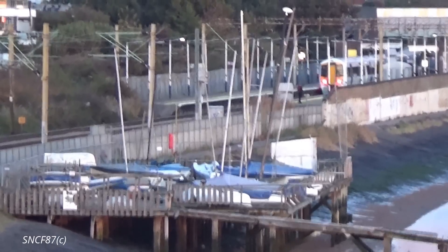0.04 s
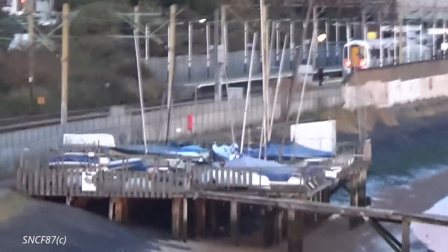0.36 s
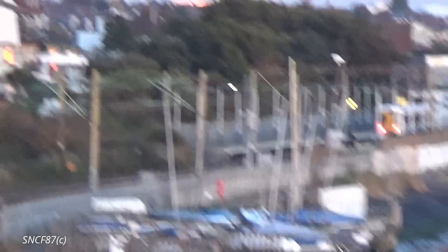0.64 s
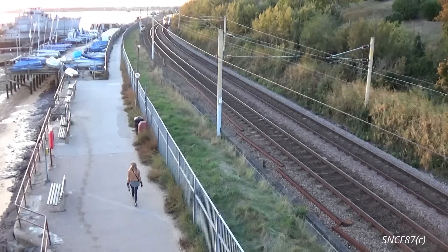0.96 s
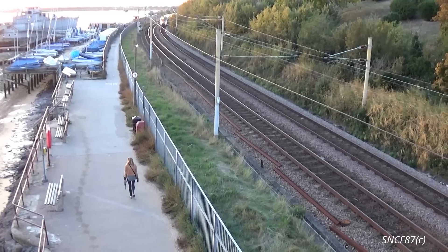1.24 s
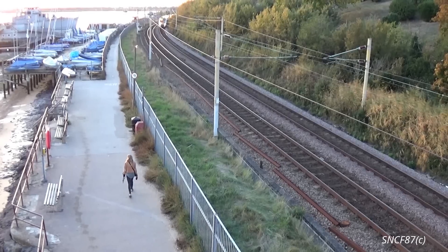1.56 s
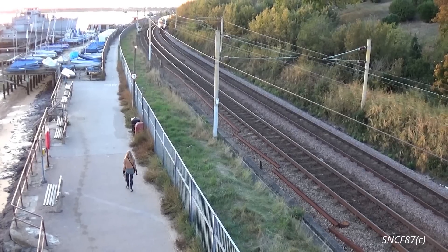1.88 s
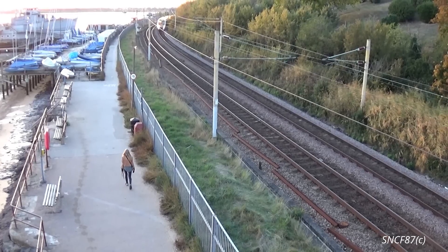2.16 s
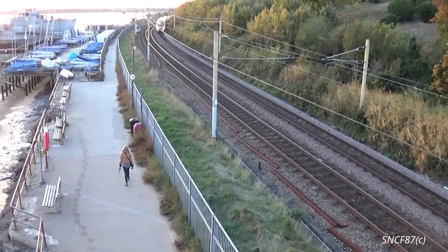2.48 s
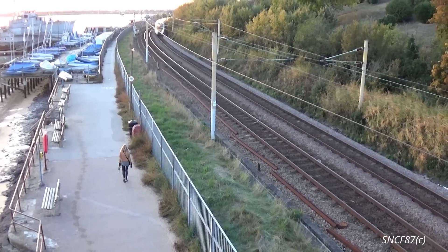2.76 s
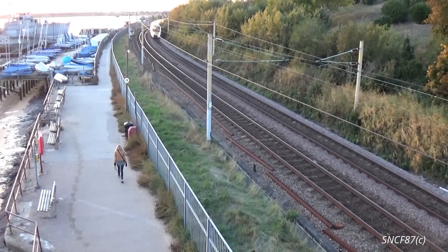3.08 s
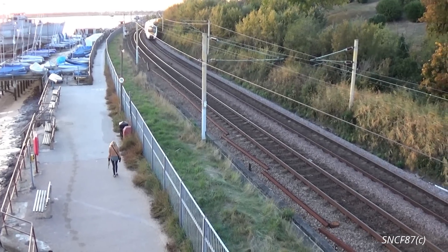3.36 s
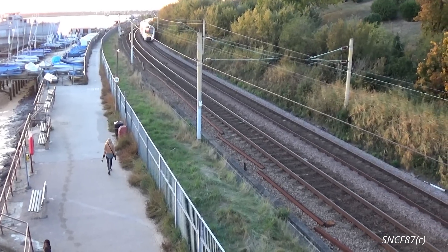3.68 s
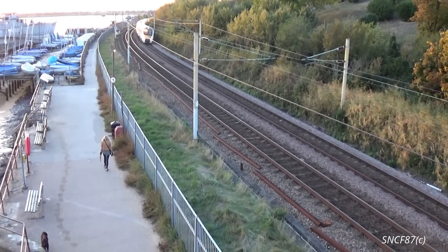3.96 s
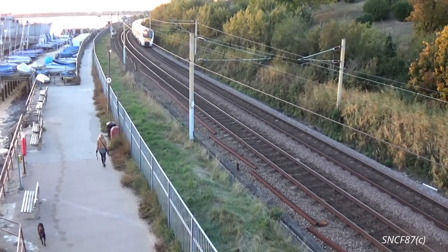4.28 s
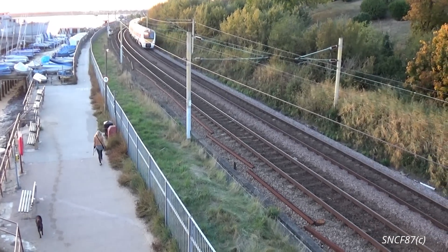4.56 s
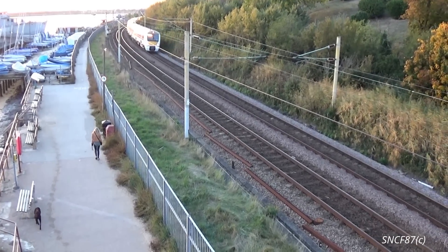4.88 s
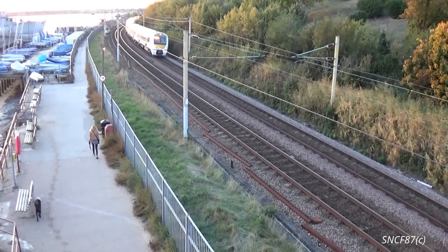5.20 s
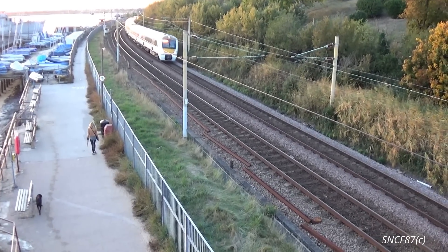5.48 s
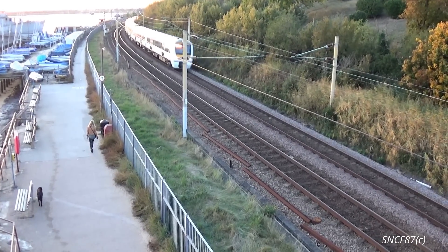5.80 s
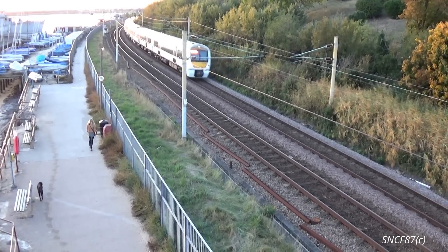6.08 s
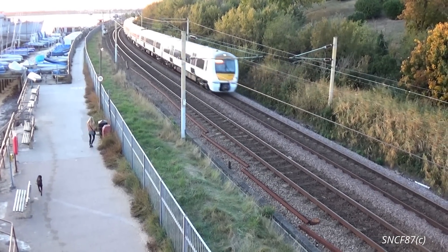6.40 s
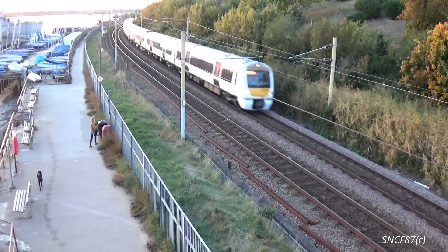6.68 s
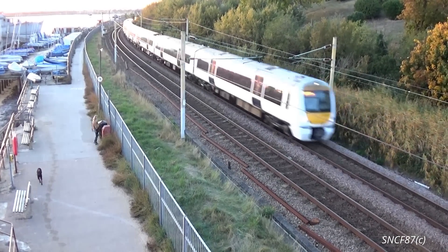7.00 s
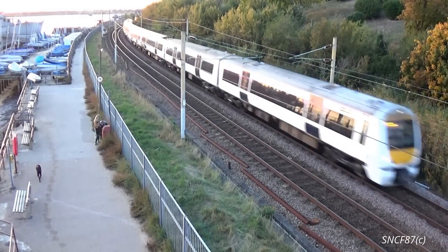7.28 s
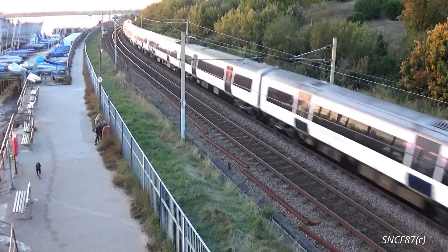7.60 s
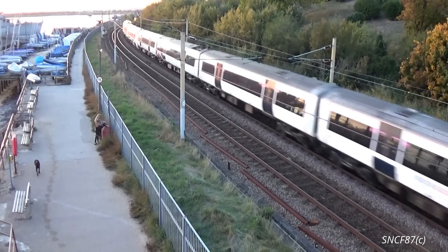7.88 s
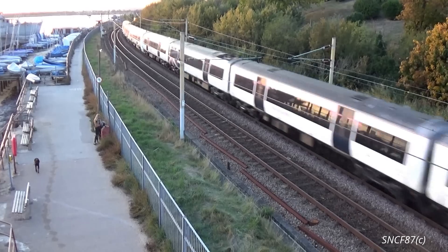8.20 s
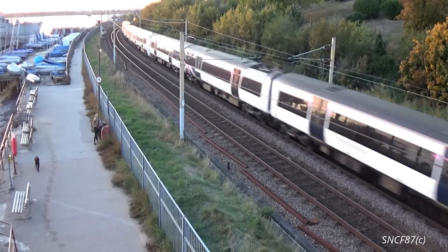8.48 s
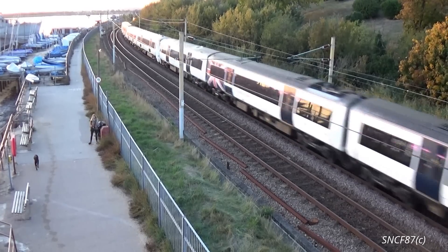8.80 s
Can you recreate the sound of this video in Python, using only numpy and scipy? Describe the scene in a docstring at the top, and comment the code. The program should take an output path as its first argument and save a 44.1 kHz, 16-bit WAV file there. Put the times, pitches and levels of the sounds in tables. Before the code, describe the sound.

Fingers click on a microphone in quiet open air, then rails ring and sizzle as an electric train approaches and roars past.

```python
"""Quiet open air, a small bird and fingers clicking on the microphone housing, up on a footbridge.
After a second the rails start to ring and sizzle, carrying wheel noise ahead of an electric train that is
still behind a bend. Knocks sound along the line and the rolling roar grows as the train closes in.
Near the end it passes under the microphone, its wheels howling on the rippled rail heads."""
import sys
import numpy as np
from scipy import signal
from scipy.io import wavfile
from scipy.ndimage import uniform_filter1d

SR = 44100
rng = np.random.default_rng(int(sys.argv[2]) if len(sys.argv) > 2 else 0)


def store_wav(level_fs):
    """Save 16-bit WAV to argv[1]."""
    pcm = np.round(np.clip(np.atleast_2d(level_fs), -1, 1) * 32767)
    wavfile.write(sys.argv[1], SR, pcm.T.astype(np.int16))


N = 399105

SIZE, HOP = 2048, 256  # samples in a spectral frame, and between frames
HZ = np.fft.rfftfreq(SIZE, 1 / SR)
FRAME_S = np.arange(N // HOP + 3)[:, None] * HOP / SR
# the train clears the bend, its first wheels are close below, its cab goes under the bridge
CLEAR_S, ARRIVE_S, UNDER_S = 1.6, 7.174, 7.64
TOUCH_S, SING_S = 1.04, 1.2  # the rails sound once briefly, then start to sing


def gain_of(db):
    """Decibels to amplitude."""
    return 10 ** (np.asarray(db) / 20)


def unit_rms(x):
    """Scales to rms 1."""
    return x / np.sqrt(np.mean(x ** 2) + 1e-20)


def unit_power(shape, band_hz=(0, 22050)):
    """Scales a spectrum to power 1 inside a band."""
    inside = (HZ >= band_hz[0]) & (HZ <= band_hz[1])
    return shape / np.sqrt(np.sum(shape ** 2 * inside, axis=-1, keepdims=True) + 1e-20)


def curve(points):
    """Interpolates a spectrum table on a log-frequency axis."""
    hz, value = np.transpose(points)
    return np.interp(np.log(HZ + 1), np.log(hz + 1), value)


def resonances(modes, hz=HZ):
    """Amplitude response of a set of steep-sided resonances."""
    peaks = (gain_of(db) / (1 + ((hz - centre) / (.78 * width)) ** 2) for centre, width, db in modes)
    return np.sqrt(sum(peak ** 2 for peak in peaks))


def flicker(frames, bins):
    """Random field of rms 1, smooth over time and frequency."""
    field = rng.standard_normal((len(FRAME_S), len(HZ)))
    field = uniform_filter1d(field, frames, axis=0, mode="wrap")
    return unit_rms(uniform_filter1d(field, bins, axis=1, mode="wrap"))


def after(moment_s, ramp_s=.09):
    """Goes from 0 to 1 around a moment."""
    return np.clip((FRAME_S - moment_s) / ramp_s + .5, 0, 1)


def hump(offset, width):
    """A bell of height 1, given its width at half height."""
    return .5 ** ((2 * offset / width) ** 2)


def add(mix, start_s, sound):
    """Mixes a sound in at a time."""
    part = mix[round(start_s * SR):][:len(sound)]
    part += sound[:len(part)]


def ahead_m(speed_m_per_s=36):
    """Distance that the first wheels still have to cover."""
    return speed_m_per_s * np.maximum(ARRIVE_S - FRAME_S, 0)


def nearness(half_m=5.4):
    """0 far down the line, 1 with the wheels below the microphone."""
    return half_m / (half_m + ahead_m())


def stereo_noise(shape, pan_db, spread):
    """Shaped noise at the microphone pair: positive pan is left, a wide source arrives less alike."""
    # likeness of the two channels: freq_hz, coherence
    likeness = [(30, 0.96), (130, 1), (300, .97), (700, 0.88), (1400, 0.91), (3100, 0.95), (6500, 0.94),
                (9000, 0.71), (14000, 1)]
    # left level over right: freq_hz, level_db
    balance = [(30, 5), (150, 0), (400, 1.5), (2400, 1), (4400, 1.5), (6300, 0), (8200, -0.5), (10500, 1),
               (15000, 2.5)]
    # left phase ahead of right: freq_hz, lead_rad
    lead = [(0, 0), (150, -0.38), (300, 0.19), (700, -0.3), (1500, -0.38), (2200, 0.19), (5500, 0.6),
            (6370, -0.85), (7200, -0.32), (8500, -0.56), (10000, 0)]
    a, b, c, d = rng.standard_normal((4, len(FRAME_S), len(HZ)), dtype=np.float32)
    coherence = np.clip(1 - spread * (1 - curve(likeness)), -1, 1)
    left = a + 1j * b
    right = (coherence * left + np.sqrt(1 - coherence ** 2) * (c + 1j * d)) * np.exp(-1j * curve(lead))
    lean = gain_of((curve(balance) + pan_db) / 2)
    spectra = np.array([left * lean, right / lean]) * shape * np.sqrt(SIZE / HOP) / 2
    return signal.istft(spectra, nperseg=SIZE, noverlap=SIZE - HOP, time_axis=1, freq_axis=2)[1][:, :N]


def burst(t60_s, centre_hz, colour, octaves):
    """A dying puff of noise through a minimum-phase filter around a centre frequency; peak near 1."""
    t = np.arange(SR // 4) / SR
    gain = colour / (1 + (np.log2((HZ + 1) / centre_hz) / octaves) ** 2) + 1e-4
    log_gain = np.log(np.r_[gain, gain[-2:0:-1]])
    response = np.fft.ifft(np.exp(np.conj(signal.hilbert(log_gain)))).real
    puff = rng.standard_normal(len(t)) * gain_of(-60 * t / t60_s)
    sound = signal.fftconvolve(puff, response[:SIZE // 2])
    return sound / np.sort(abs(sound))[-3:].mean()


def hits(rows, colour, octaves, pan_db):
    """Short blows that share one colour and one direction."""
    out = np.zeros(N)
    for start_s, peak_db, centre_hz, t60_s in rows:
        add(out, start_s, gain_of(peak_db) * burst(t60_s, centre_hz, colour, octaves))
    return out * gain_of([[pan_db / 2], [-pan_db / 2]])


def air():
    """Far wind and traffic over the shore, wide and a little to the left."""
    # spectrum of still outdoor air: freq_hz, density_db
    spectrum = [(15, -52), (25, -50), (82, -11), (122, -9.5), (160, -5), (313, -1.5), (582, -2), (997, 5.5),
                (1240, 0), (1900, -3.5), (3630, -21.5), (5730, -22), (15500, -31)]
    shape = gain_of(-48 + 1.2 * flicker(12, 30)) * unit_power(gain_of(curve(spectrum)))
    return stereo_noise(shape, pan_db=2.3 * np.clip(HZ / 450, 0, 1), spread=1.5)


def bird():
    """Thin, nearly pure whistles from the bushes."""
    # calls: start_s, length_s, start_hz, end_hz, level_db
    chirps = [(0, .05, 3450, 3150, -66), (.02, 0.17, 5560, 5620, -71), (.46, .19, 6000, 5880, -67),
              (.765, .04, 7500, 8000, -68), (.82, .06, 2500, 2700, -66)]
    out = np.zeros(N)
    for start_s, length_s, start_hz, end_hz, level_db in chirps:
        count = int(length_s * SR)
        waver_hz = 25 * unit_rms(uniform_filter1d(rng.standard_normal(count), size=200))
        pitch_hz = np.linspace(start_hz, end_hz, count) + waver_hz
        whistle = np.sqrt(2) * np.sin(2 * np.pi * np.cumsum(pitch_hz) / SR)
        add(out, start_s, gain_of(level_db) * np.hanning(count) * whistle)
    return out


def finger_clicks():
    """Fingers tap the housing right at the microphone and make it ring."""
    # taps: start_s, peak_db, centre_hz, t60_s
    taps = [(.1235, -20, 4300, 0.023), (.192, -37, 9000, .018), (.199, -38, 8000, .014),
            (.2528, -21, 8000, .012), (.2597, -14.5, 2550, 0.012), (.2655, -31, 2200, .025),
            (.2814, -15, 7000, 0.0073), (.3485, -32.5, 2400, .03), (.4055, -28, 230, 0.026),
            (.4595, -40, 1500, .03), (.5535, -37, 2200, 0.027), (.6265, -34, 2400, 0.04),
            (.732, -39, 2800, .03), (.7495, -36, 2800, 0.025), (1.124, -36, 9000, .015),
            (1.152, -37, 9000, .03), (1.179, -28, 9500, 0.022)]
    # housing resonances: centre_hz, width_hz, level_db
    housing = [(1090, 450, 12), (1810, 400, 9), (3160, 1600, 1), (4900, 1100, -3), (6150, 630, -8.5),
               (9400, 1700, -2.5)]
    return hits(taps, resonances(housing) + gain_of(-17), octaves=1.2, pan_db=1)


def track_knocks():
    """Clacks and thuds along the line while the train is still some way off."""
    # knocks: start_s, peak_db, centre_hz, t60_s
    knocks = [(1.728, -16, 1060, 0.16), (1.831, -24.5, 1700, .17), (2.305, -27, 1100, .15),
              (3.212, -27, 520, .13), (3.494, -25, 480, 0.099), (4.04, -32, 2200, .15),
              (4.24, -24.5, 800, 0.058), (5.14, -20.5, 1200, .1)]
    # their common spectrum: freq_hz, density_db
    colour = [(150, -42), (450, 0.5), (950, -3.5), (1400, -10.5), (1900, 0), (3000, -6), (5500, -11),
              (12000, -23)]
    return hits(knocks, gain_of(curve(colour)), octaves=.95, pan_db=2)


def rail_level_db(crest_s, crest_db, growth_db_per_s, bend_db, surge_share, fade_db_per_s=2):
    """One voice of the rails: weaker behind the bend, it grows to a crest, then fades, surging."""
    # about one surge per carriage: peak_s, lift_db
    surges = [(1.99, 0), (2.68, 1.5), (3.26, 2.5), (3.9, 4), (4.56, 4), (5.15, 2), (5.88, 3), (6.44, 4),
              (6.98, 3.5), (7.52, 1.5), (8.06, 2.5), (8.63, 3)]
    rise_db = growth_db_per_s * np.minimum(FRAME_S - crest_s, 0)
    fade_db = fade_db_per_s * np.maximum(FRAME_S - crest_s, 0)
    surge_db = sum(lift_db * hump(FRAME_S - peak_s, .27) for peak_s, lift_db in surges)
    return crest_db + rise_db - fade_db + bend_db * (1 - after(CLEAR_S)) + surge_share * surge_db


def rail_ring():
    """The rails' strongest cluster of resonances sets in all at once, long before the train is near."""
    # ringing rail resonances: centre_hz, width_hz, level_db
    modes = [(6100, 290, -20), (6040, 38, -16.5), (6230, 53, 1), (6362, 35, 0), (6370, 37, -11),
             (6170, 310, -6.5)]
    # a more heavily damped resonance just above joins in once the wheels are closer
    shoulder_db = np.interp(FRAME_S, [3, 4, 5.05, 6], [-19, -1, -2.5, -1.5])
    shoulder = resonances([(6590, 100, 0)]) * gain_of(shoulder_db)
    shape = unit_power(np.hypot(resonances(modes), shoulder))
    level_db = rail_level_db(crest_s=5.5, crest_db=-31.5, growth_db_per_s=2.5, bend_db=-4, surge_share=.9)
    ring = stereo_noise(shape * gain_of(level_db + 1.3 * flicker(12, 8)), pan_db=-6.5, spread=1.3)
    t = np.arange(N) / SR
    touch = .51 * (t > TOUCH_S) * np.exp(-abs(t - TOUCH_S) / .06)
    return ring * (touch + np.clip((t - SING_S) / .012, 0, 1))


def rail_hiss():
    """Moving spectrum of the broad hiss, which dies fastest along the rail and so is heard last."""
    # hiss of the steel: freq_hz, density_db
    spectrum = [(100, -80), (2500, -58), (5000, -15.5), (7200, -8), (8400, -3.5), (9600, 0.5), (10500, 0),
                (11400, -5.5), (12500, -13), (15500, -22)]
    level_db = rail_level_db(crest_s=5.5, crest_db=-25, growth_db_per_s=6.5,
                             bend_db=-6.5, surge_share=1.06)
    return unit_power(gain_of(curve(spectrum)), band_hz=(8300, 11500)) * gain_of(level_db)


def rail_sizzle():
    """Moving spectrum of the sizzle: only resonances survive a long rail; near wheels fill the gaps."""
    # high rail resonances: centre_hz, width_hz, level_db
    modes = [(5430, 200, -5), (7860, 50, 4), (8300, 90, 3), (9750, 35, -2), (10100, 50, 1.5),
             (10230, 45, 12), (10530, 240, 4), (11540, 45, 5), (12430, 150, -4), (13420, 96, 8),
             (13700, 30, 7.5), (13500, 220, -4), (13800, 23, 8), (15300, 140, -1)]
    # broad sound between them: freq_hz, density_db
    bed = [(100, -65), (2000, -25), (3400, -8), (4800, 0.5), (7500, -2.5), (9500, -11), (11500, 2.5),
           (12800, -2), (13800, -2), (14200, -2), (15700, -4)]
    lines = resonances(modes) * gain_of(1.5 - 7 * nearness() + 1.5 * flicker(14, 6))
    shape = unit_power(np.hypot(gain_of(curve(bed)), lines), band_hz=(12800, 15500))
    level_db = rail_level_db(crest_s=6, crest_db=-34, growth_db_per_s=2.5, bend_db=-8.5, surge_share=.08)
    onset = after(SING_S, ramp_s=.02) + .39 * hump(FRAME_S - TOUCH_S, .05)
    return shape * gain_of(level_db - 9 * after(UNDER_S) + 1.17 * flicker(26, 400)) * onset


def rails():
    """Wheel noise runs ahead through the steel and radiates from a thicket of narrow resonances."""
    shape = np.hypot(rail_hiss(), rail_sizzle())
    thicket = np.clip(rng.standard_normal(len(HZ)), -2, 1)
    thicket_db = 1.7 * (1 - .54 * nearness()) * thicket + 1.6 * flicker(40, 4)
    flutter_db = .9 * flicker(12, 25) + .6 * flicker(6, 500)
    return stereo_noise(shape * gain_of(thicket_db + flutter_db), pan_db=-1.5, spread=.43)


def rolling_roar(alongside_db=-27.5, half_amplitude_m=36.1, rough_width_octaves=1.9):
    """Rolling noise, growing as 1 / distance: dull from afar, gaining bass and treble close by."""
    # roar from far down the line: freq_hz, density_db
    far_spectrum = [(25, -41), (80, -37), (160, -14.5), (260, -10.5), (350, -10.5), (480, -1.5), (640, 0.5),
                    (780, -2), (950, 0.5), (1400, -4.5), (1900, -2.5), (2900, -12.5), (6000, -21.5),
                    (15500, -37)]
    # roar from just below the bridge: freq_hz, density_db
    near_spectrum = [(25, -54), (80, -28), (160, -13), (270, -2.5), (370, -7.5), (620, 4.5), (850, 1),
                     (1350, -0.5), (1850, -2), (2600, -1), (3300, -3.5), (5500, -6.5), (9000, -9.5),
                     (12000, -32), (15500, -43)]
    # loss behind the bend: freq_hz, gain_db
    bend_shadow = [(500, -1.2), (1500, -1.9), (3000, -5)]
    # swells on rough stretches of track: peak_s, length_s, lift_db, centre_hz
    rough_track = [(2.3, 0.55, 5, 4800), (3.25, 0.57, 1.1, 550), (4.051, 0.29, 3.8, 3010),
                   (4.75, .25, 2.5, 2800), (5.35, 0.3, 2.5, 1400), (7.25, 0.18, -0.5, 4000),
                   (8.302, 0.72, 2.8, 250)]
    near = nearness()
    spectrum_db = (1 - near) * curve(far_spectrum) + near * curve(near_spectrum)
    shape = unit_power(gain_of(spectrum_db), band_hz=(150, 900))
    distance_db = 20 * np.log10(1 + ahead_m() / half_amplitude_m)
    level_db = alongside_db - distance_db + curve(bend_shadow) * (1 - after(CLEAR_S))
    rough_db = sum(db * hump(FRAME_S - s, length_s) * hump(np.log2((HZ + 1) / hz), rough_width_octaves)
                   for s, length_s, db, hz in rough_track)
    flutter_db = 1.5 * flicker(10, 12) + .59 * flicker(7, 600)
    # the track lies to the right; the pan fades out in the bass
    pan_db = (-1.6 - 2.4 * near) * np.clip(HZ / 450, 0, 1)
    return stereo_noise(shape * gain_of(level_db + rough_db + flutter_db), pan_db, spread=.21 + 1.3 * near)


def wheel_howl(catch_db=6.5, throb_s=.48):
    """Close wheels run over the rail ripple; its uneven spacing smears each harmonic into a band."""
    # four harmonics of the ripple: centre_hz, width_hz, level_db
    harmonics = [(518.5, 56, -5), (1073, 114, -4), (1624, 107, -1), (2145, 123, 0)]
    # weaker upper bands, swelling with the third harmonic: centre_hz, width_hz, level_db
    upper = [(2650, 120, -25), (3300, 67, -22), (3720, 140, -15), (4240, 84, -21.5), (4740, 150, -17.5),
             (5800, 220, -21.5)]
    # each harmonic catches with a jump, grows, holds: catch_s, full_s, level_db, growth_db_per_s, throb_db
    swells = [(6.62, 7.6, -25.5, 7.5, .4), (5.97, 7.23, -23.5, 8.5, 0), (6.94, 7.24, -22.5, 13, 0.9),
              (7.6, 7.7, -22.2, 10, 0.4)]
    # the pitch creeps up, then sags as the wheels come abreast: time_s, pitch_ratio
    glide = [(6, 0.96), (7.8, 1), (8.4, 0.99), (9.05, 0.98)]
    hz = HZ / np.interp(FRAME_S, *np.transpose(glide))
    groups = [harmonics[:1], harmonics[1:2], harmonics[2:3] + upper, harmonics[3:]]
    power = 0
    for (catch_s, full_s, full_db, growth_db_per_s, throb_db), bands in zip(swells, groups):
        t = FRAME_S - full_s
        level_db = full_db + growth_db_per_s * np.minimum(t, 0) - catch_db * (1 - after(catch_s))
        level_db += throb_db * np.cos(2 * np.pi * t / throb_s)
        power += (gain_of(level_db) * unit_power(resonances(bands, hz))) ** 2
    # single wheels stand out as short-lived lines
    return stereo_noise(np.sqrt(power) * gain_of(1.76 * flicker(24, 3)), pan_db=-3, spread=1.34)


def scene(train_start_s=.958):
    """Quiet on the footbridge; the level dips for a few milliseconds, then the train is heard."""
    train_s = np.arange(N) / SR - train_start_s
    train = (rolling_roar() + wheel_howl() + rail_ring() + rails()) * np.clip(train_s / .026, 0, 1)
    dip = np.clip(abs(train_s) / .003 - 1, .1, 1)
    return (finger_clicks() + track_knocks() + air() + bird() + train) * dip


def record(dry, cutoff_hz=15780):
    """The microphone chain's steep upper band limit."""
    lowpass = signal.firwin(1023, cutoff_hz, window=("kaiser", 9), fs=SR)
    return signal.oaconvolve(dry, lowpass[None], "same")


dry = scene()
out = record(dry)
store_wav(out)
```